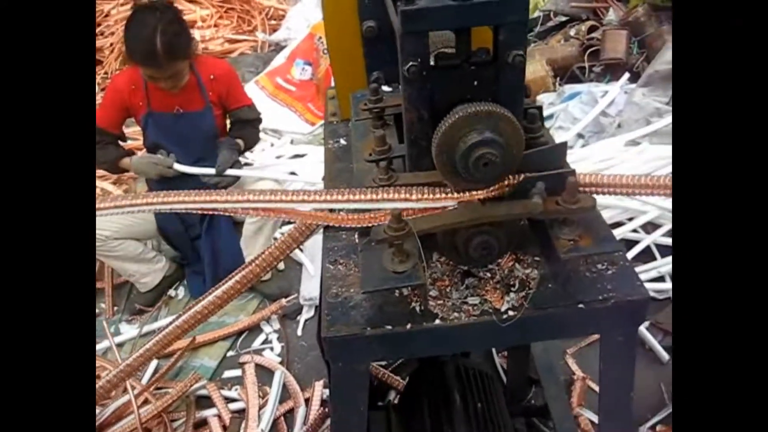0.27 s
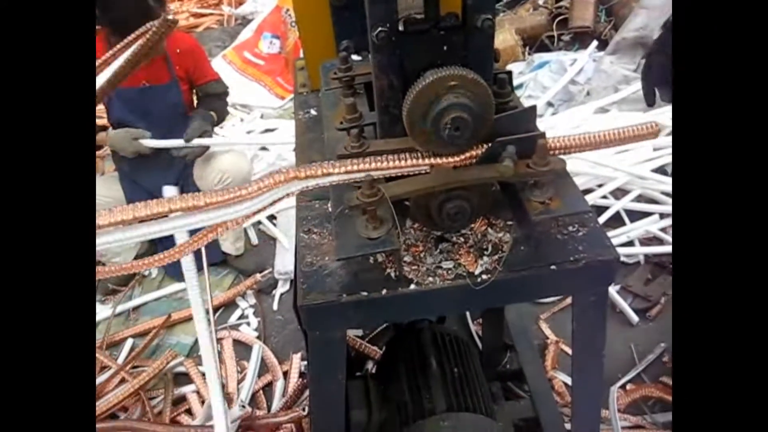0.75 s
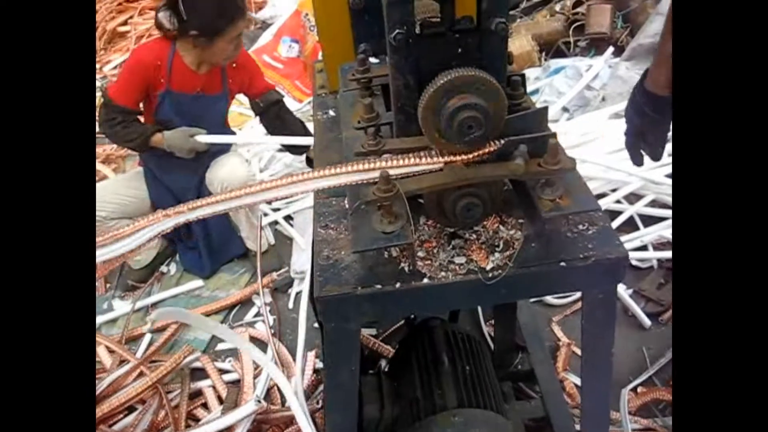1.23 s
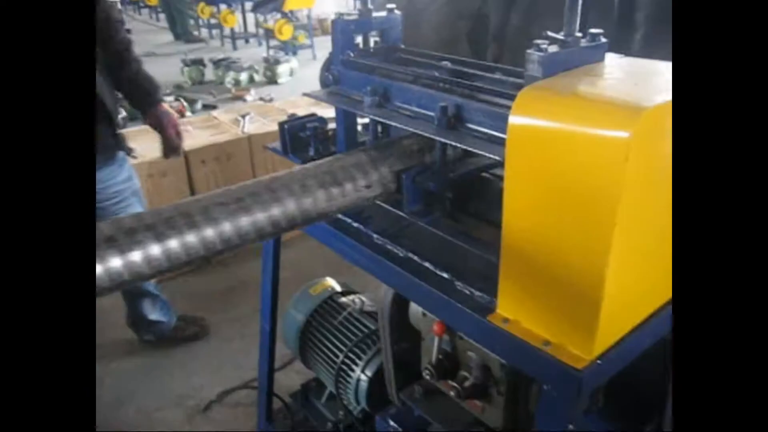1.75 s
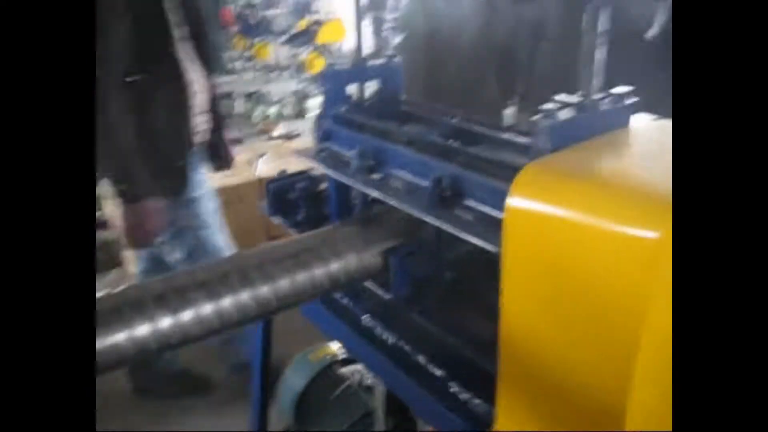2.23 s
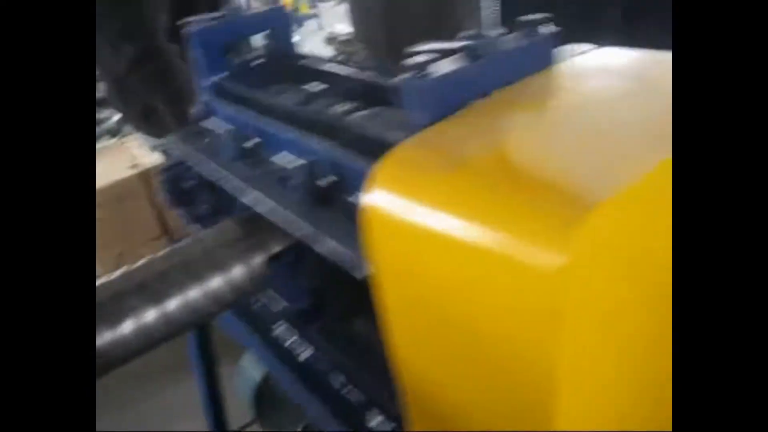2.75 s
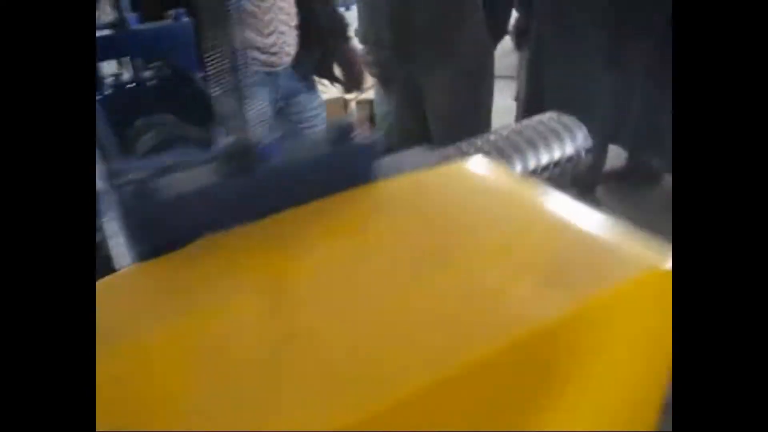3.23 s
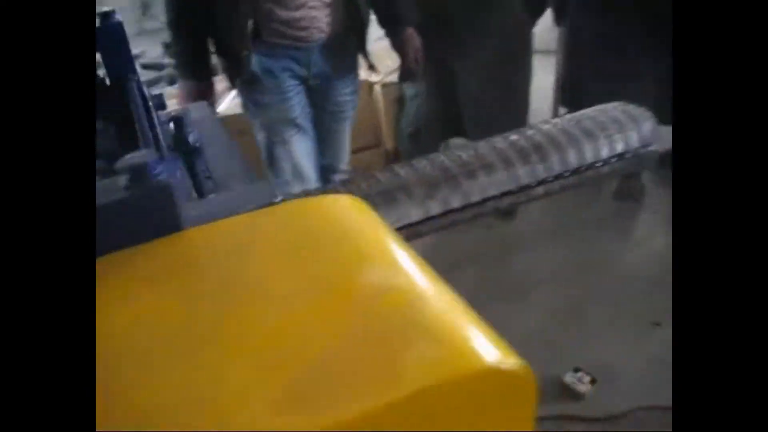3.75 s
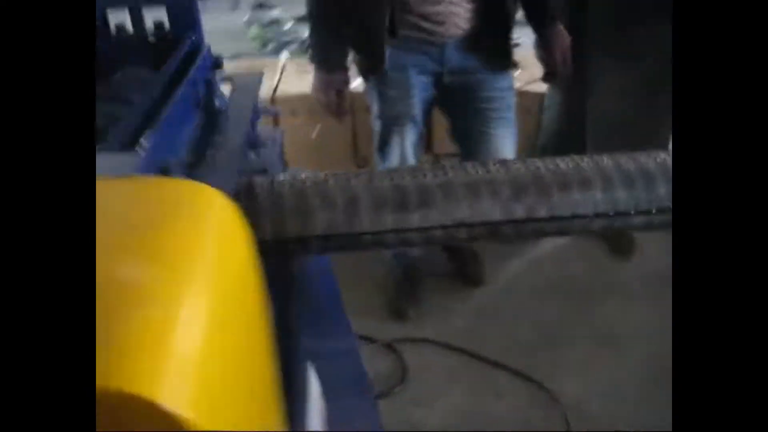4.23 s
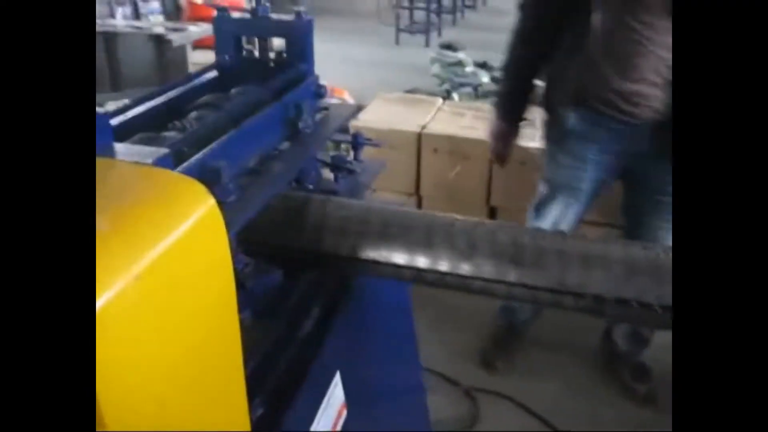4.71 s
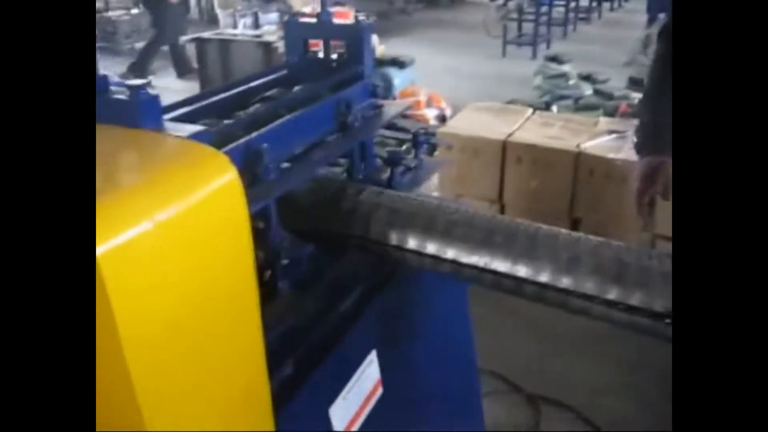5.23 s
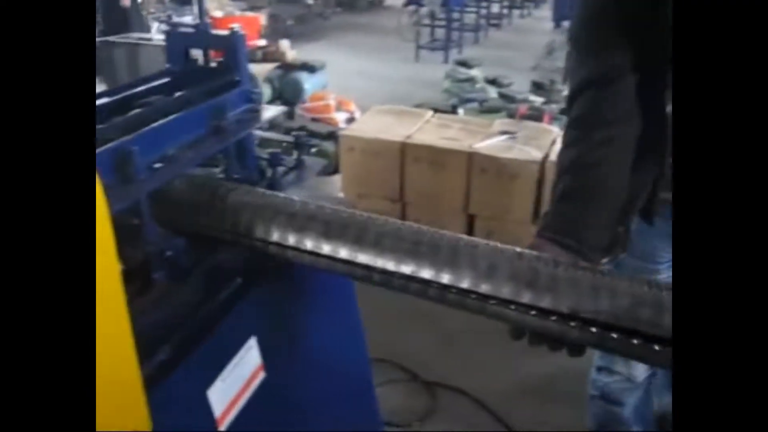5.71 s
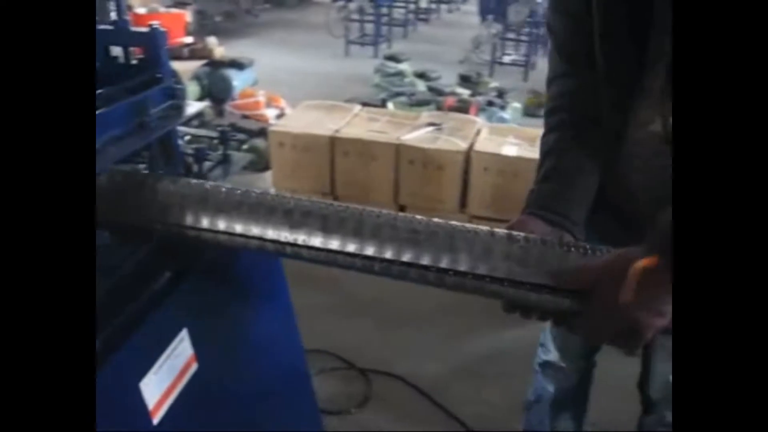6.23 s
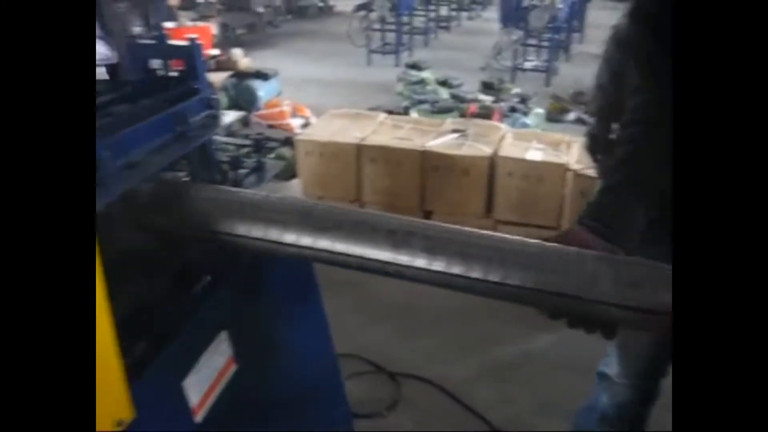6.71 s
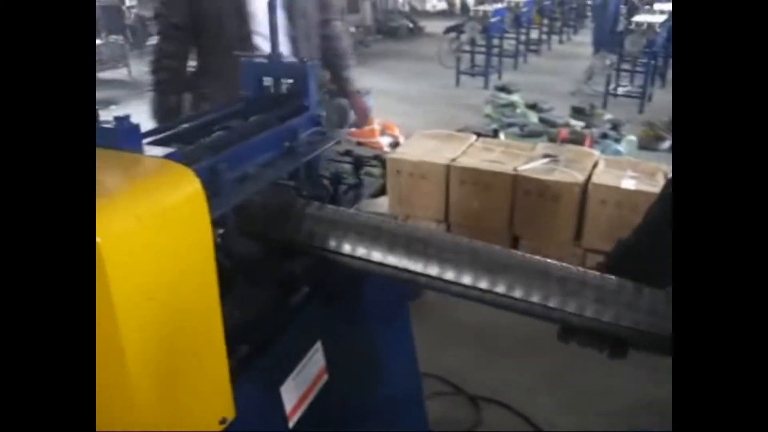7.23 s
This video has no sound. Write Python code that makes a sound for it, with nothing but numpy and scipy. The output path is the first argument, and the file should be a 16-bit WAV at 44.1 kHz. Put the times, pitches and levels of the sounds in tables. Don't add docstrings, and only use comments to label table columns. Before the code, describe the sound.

Close, band-limited camera sound of two cable-stripping machines. The first is small, with uneven tooth chatter, surging hum, bright copper scraping and one knock. A blink of silence follows, then a fuller, continuous grind from a large stripper, its gears swelling, rollers squeaking and blade hissing thinly. Dry clicks appear early, and two hard sheath snaps near the end briefly push the machine noise down.

```python
import sys
import numpy as np
from scipy import signal
from scipy.fft import rfft, irfft, next_fast_len
from scipy.io import wavfile
from scipy.ndimage import uniform_filter1d

SR = 44100
rng = np.random.default_rng(int(sys.argv[2]) if len(sys.argv) > 2 else 0)


def dump(signal):
    limited = np.clip(np.atleast_2d(signal).T, -1, 1)
    pcm = np.round(limited * 32767).astype(np.int16)
    wavfile.write(sys.argv[1], SR, pcm)


def boost(x):
    u = np.asarray(x, float) / 20
    return 10 ** u


N = 328986

# start_s, end_s
SHOT_TIMES = [
    (0, 1.7215),
    (1.8915, 7.46),
]

LAYER_BORDERS = [270, 1500, 3200]
# freq_hz, density_db (per Hz)
SMALL_CHATTER_COLOUR = [(15, -32), (25, 3), (64, -9.5), (194, -6.5), (233, -8.5), (280, -6), (499, -10.5),
                        (737, -6), (827, -10.5), (1250, -8.5), (1690, -11), (2560, -11.5), (4650, -11),
                        (6130, -22.5), (7970, -81.5), (13500, -120)]
LARGE_CHATTER_COLOUR = [(15, -49), (25, -10), (86, -11), (266, -7.5), (478, -15.5), (586, -16.5),
                        (734, -17.5), (1380, -19.5), (2020, -20), (3170, -20.5), (3630, -19.5),
                        (5450, -16.5), (7080, -23), (12000, -120)]
# freq_hz, width_hz, over_colour_db
SMALL_RESONANCES = [(63, 8.7, 2.5), (198.5, 10, 9), (227.3, 8.4, 10), (345, 14, 7.5), (364.4, 12, 6),
                    (440, 20, 7.5), (578, 18, 3.5), (603, 24, 6), (743.5, 19, 9.5), (984, 5.8, 5.5),
                    (1130, 14, -16), (1160, 11, 4), (1267, 36, 7), (1317, 28, -1.5), (2750, 970, -0.5)]
LARGE_RESONANCES = [(51, 12, 7.5), (67, 7.3, 5.4), (91, 12, 5.1), (134.8, 8, 7.6), (188.7, 9.1, 0.93),
                    (218.6, 7.7, 8.9), (294.7, 11, 4.6), (324, 4, 7.7), (367, 2.8, 3.4), (399.3, 16.7, 6.1),
                    (448, 5, 5.6), (586.6, 40, 7.5), (677, 23, 6.4), (666, 3.3, 1.3), (805, 38, 3.5),
                    (870, 3.9, 3), (930, 62, 4.5), (1068, 28, 5.5), (1860, 38, 2.5), (2010, 54, 3),
                    (2260, 25, 2.8), (3680, 930, 4.5), (5120, 47, 2.2)]
# time_s, load_db, openness_db
ROLLER_PULL = [
    [(0, -1, 2.5), (.25, 0.5, -1.5), (.6, 2, -3), (.8, 2, 0), (1.1, 0, 0.5), (1.23, -2, 4.5),
     (1.35, -4.5, 0), (1.48, -5.5, 1.5), (1.68, -7, -1.5)],
    [(1.9, 0.5, 1.5), (2.05, 0, 1), (2.19, 4.5, 0), (2.45, 4.5, -1.5), (2.86, 1.5, 0), (3.13, 0.5, 0.5),
     (3.4, 2.5, -1), (3.67, 0.5, 0.5), (4.07, -1.5, 1), (4.25, -3, 0), (4.75, -1, -1), (5.02, 0, -2),
     (5.42, 2, -2.5), (5.96, 0, -2), (6.2, 1, 0.5), (6.5, -0.5, -1.4), (7.05, 0.5, -0.5), (7.46, -3, -1)],
]
# rest_db, load_share, openness_share
LAYER_RESPONSE = [
    [(-37.5, 0.74, -0.26), (-30, 0.79, 0.19), (-33.5, 0.83, 0.45), (-34, 1.36, 1.5)],
    [(-29, 0.48, -0.56), (-28, 0.94, 0.35), (-30.5, 0.66, 0.45), (-27, 0.88, 1.28)],
]
# time_s, floor_db, frame_db
MIC_BOOM = [
    [(0, -2, 0.2), (.6, 2.5, 1.3), (1.1, 1.5, .1), (1.7, -0.5, -0.4)],
    [(1.9, 3, 0.5), (2.1, -1.5, 2.7), (2.45, 0, -1.5), (3.1, 1, 0.8), (3.5, -3, -0.7), (3.75, 2.5, 1),
     (4.2, -0.5, 1.7), (4.9, 0, 0.6), (5.6, -1.5, 0), (6.1, 0.5, -0.2), (6.4, 2, 0.1), (7.46, 1.5, -0.4)],
]

# start_s, length_s, level_db, pitch_hz
SMALL_MESH_SURGES = [(0.004, 0.075, -32, 292.3), (0.108, 0.028, -36, 293), (0.253, 0.04, -37, 290.8),
                     (0.356, 0.045, -33.5, 284), (0.428, 0.076, -32.5, 283.3), (0.547, 0.054, -27.5, 290.6),
                     (0.618, 0.057, -31, 288.7), (0.702, 0.14, -33.5, 279.4), (0.841, 0.15, -27, 292.2),
                     (1.004, 0.028, -29, 290), (1.069, 0.04, -29, 291.6), (1.122, 0.039, -23, 292.0),
                     (1.215, 0.061, -30.5, 291), (1.355, 0.042, -32.5, 292.5), (1.533, 0.068, -34.5, 295)]
LARGE_MESH_SURGES = [(1.956, 0.075, -25, 266.1), (2.186, 0.041, -26.5, 261.9), (2.268, 0.031, -31, 263.4),
                     (2.406, 0.039, -27, 269.9), (2.532, 0.1, -25.5, 267.2), (2.719, 0.061, -30.5, 266.6),
                     (2.855, 0.13, -26, 261.0), (3.086, 0.19, -21.5, 263.2), (3.381, 0.056, -35, 279.4),
                     (3.481, 0.032, -19.5, 273.7), (3.621, 0.056, -21, 266.1), (3.723, 0.18, -25, 266.6),
                     (3.962, 0.076, -22, 264.5), (4.078, 0.37, -26, 265.2), (4.495, 0.029, -22, 262.6),
                     (4.595, 0.043, -28, 268.6), (4.678, 0.1, -22, 265.5), (4.828, 0.035, -30, 268.6),
                     (5.034, 0.14, -28.5, 263.0), (5.209, 0.29, -32.5, 264.8), (5.528, 0.14, -28, 264.5),
                     (5.752, 0.11, -25.5, 261.9), (5.912, 0.06, -27, 268.6), (6.003, 0.09, -27.5, 266.2),
                     (6.149, 0.08, -27, 265.9), (7.272, 0.086, -29, 265.3)]
# start_s, length_s, level_db, pitch_hz
SHAFT_SURGES = [(1.927, 0.056, -39, 187.8), (2.239, 0.28, -31, 186.7), (2.482, 0.16, -33, 187.8),
                (2.653, 0.07, -29, 190.2), (2.782, 0.12, -24.5, 183.4), (2.948, 0.047, -29, 184.8),
                (3.024, 0.036, -23, 188.9), (3.13, 0.032, -38, 192.8), (3.2, 0.044, -33, 195.7),
                (3.293, 0.11, -28, 185.9), (3.428, 0.036, -30, 195.2), (3.496, 0.12, -24, 189.2),
                (3.686, 0.087, -33, 187.8), (3.883, 0.05, -29.5, 186.3), (4.664, 0.09, -32, 187.9),
                (4.919, 0.03, -21, 187.3), (5.016, 0.074, -44, 186.6), (5.438, 0.027, -34, 185.5),
                (5.723, 0.13, -28.5, 189.1), (5.934, 0.042, -30, 190.2), (7.177, 0.041, -35, 192.5)]
# time_s, level_db
MOTOR_WHINE = [(1.9, -36), (2.9, -38.5), (3.5, -40.5), (3.9, -60), (4.5, -45), (5.5, -42.5), (5.7, -45.5),
               (6.1, -41), (7.4, -42.5)]
# start_s, length_s, pitch_hz, level_db
ROLLER_SQUEALS = [(0.355, 0.83, 63, -40.5), (2.038, 0.11, 345, -27), (2.364, 0.31, 2000, -49),
                  (2.62, 0.35, 2110, -40), (3.007, 0.2, 2005, -38), (3.2, 0.13, 1870, -35.5),
                  (3.558, 0.21, 2260, -34.5), (3.551, 0.36, 393.6, -35), (3.62, 0.27, 501, -36),
                  (3.599, 0.14, 637, -37.5), (3.602, 0.36, 708, -37.5), (3.605, 0.21, 2000, -36),
                  (3.941, 0.47, 330.3, -31), (4.148, 0.22, 2010, -44), (4.35, 0.15, 1860, -38),
                  (5.304, 0.33, 2010, -38.5), (5.628, 0.23, 2043, -34.5), (5.68, 0.22, 2130, -37),
                  (5.846, 0.33, 1755, -40), (6.65, 0.49, 1796, -40)]
# time_s, pitch_hz, level_db
BLADE_HISS = [(1.9, 3700, -46), (2.4, 3640, -40), (2.9, 3620, -41), (3.3, 3670, -35.5), (3.6, 3650, -38),
              (4.1, 3720, -44.5), (4.5, 3700, -44), (4.8, 3540, -42), (5.1, 3560, -42.5), (5.45, 3580, -34),
              (5.7, 3590, -43), (6.15, 3630, -38), (6.5, 3650, -43), (6.9, 3630, -40), (7.46, 3660, -41)]

# start_s, peak_db, centre_hz, width_hz, t60_s
COPPER_SCRAPES = [(.255, -21, 4000, 1500, 0.056), (.332, -17.5, 4680, 1500, 0.19),
                  (0.417, -14, 4970, 1199, 0.048), (1.152, -13, 3350, 550, .12),
                  (1.207, -21, 3200, 905, 0.43), (1.153, -15, 4730, 397, 0.069),
                  (1.221, -15, 4430, 250, 0.12), (1.542, -18.5, 3800, 1498, 0.16),
                  (1.556, -21, 3800, 1500, 0.14), (1.631, -14.5, 4034, 1912, 0.093),
                  (1.657, -24, 4950, 1201, 0.05), (1.703, -28.5, 3736, 2110, 0.054)]
# start_s, peak_db, t60_s
GRIT_TICKS = [
    (2.985, -6.5, 0.019),
    (3.0118, -16.5, .02),
    (3.3485, -13, .02),
    (3.516, -16.5, .02),
    (3.548, -14, 0.027),
    (5.099, -24, .03),
]
# start_s, level_db, centre_hz, width_hz, fade_s
SNAP_TAILS = [(1.156, -27.5, 900, 299, 0.024), (2.115, -22, 2850, 450, 0.022),
              (2.114, -24, 3920, 500, .012), (6.218, -23, 1090, 260, 0.047),
              (6.217, -21.5, 2960, 450, .035), (6.22, -25, 1600, 350, 0.052), (6.25, -27, 855, 300, 0.08),
              (7.334, -25.5, 1210, 350, 0.037), (7.337, -27, 2980, 400, 0.044),
              (7.343, -24.5, 881, 170, 0.041)]
# start_s, peak_db, ring_hz, ring_length (factor), singing_db
SHEATH_SNAPS = [
    (1.155, -12, 2800, 0.8, -2),
    (2.1145, -11, 2730, 0.6, -2),
    (6.2158, -2.5, 2920, 0.75, -4),
    (7.3322, -1.5, 2750, 1.0, -4),
]
# pitch_ratio (times ring_hz), level_db, t60_s
SHEATH_MODES = [(.76, -6, .012), (.87, -6, .012), (1.0, -5, 0.02), (1.09, -5, .025), (1.22, -6, 0.014),
                (1.38, -7, .012), (1.62, -11, 0.01)]
# delay_s, level_db
WALL_ECHO = (.0225, -13)

# start_s, drop_db, recovery_s
GAIN_DUCKS = [
    (1.155, 1.5, 0.16),
    (1.626, 12, 0.0031),
    (1.895, 13.5, 0.014),
    (2.116, 6.5, 0.11),
    (2.988, 11, 0.017),
    (6.216, 5.5, 0.45),
    (7.335, 4, .4),
]
# freq_hz, lift_db
RIGHT_LIFT = [(400, 0.0), (700, 0.09), (1200, .5), (1800, 1.0), (5500, 1.07), (6300, -4.5)]
LIFT_SHARE = [.5, 1.0]
# freq_hz, level_db
TOP_BAND_COLOUR = [(6900, -23.5), (7500, -5.5), (9000, -1.5), (9400, -2), (9700, -35.5)]
TOP_BAND_DB = [-46.5, -45]
TOP_BAND_GATE = [-0.52, -1.3]
CONVERTER_OFFSET = [-.0087, -.0081]


def evened(x):
    return x / np.sqrt(np.mean(x ** 2) + 1e-20)


def read(points, hz):
    f, value = np.transpose(points)
    return np.interp(np.log(hz + 1), np.log(f + 1), value)


def shaped(x, gain):
    size = next_fast_len(x.shape[-1])
    spectrum = rfft(x, size) * gain(np.fft.rfftfreq(size, 1 / SR))
    return irfft(spectrum, size)[..., :x.shape[-1]]


def add(mix, s, sound):
    part = mix[round(s * SR):][:len(sound)]
    part += sound[:len(part)]


def wander(count, smooth_s):
    span = max(int(smooth_s * SR), 2)
    once = uniform_filter1d(rng.standard_normal(count), span)
    return evened(uniform_filter1d(once, span))


def top_band(gate):
    z = signal.stft(rng.standard_normal(N), nperseg=1024)[2]
    whole = rng.standard_normal((len(z.T), 1))
    strips = rng.standard_normal((len(z.T), 33))
    chance = uniform_filter1d(0.61 * whole + 0.85 * strips, 3, 0) * np.sqrt(3)
    is_open = np.repeat(chance, 16, 1)[:, :len(z)].T > gate
    blocks = signal.istft(z * is_open, nperseg=1024)[1][:N]
    return evened(shaped(blocks, lambda hz: boost(read(TOP_BAND_COLOUR, hz)) * (abs(hz - 8300) < 1400)))


def tone(t, rows, waver_hz, waver_s, rough_db):
    s, hz, db = np.transpose(rows)
    pitch = np.interp(t, s, hz) + waver_hz * wander(len(t), waver_s)
    level_db = np.interp(t, s, db) + rough_db * wander(len(t), waver_s)
    return np.sqrt(2) * boost(level_db) * np.sin(2 * np.pi * np.cumsum(pitch) / SR)


def whine(t):
    rows = [(s, 888, db) for s, db in MOTOR_WHINE]
    return tone(t, rows, waver_hz=1.07, waver_s=0.065, rough_db=2.5)


def hum(t, surges, rest_db, waver_hz, waver_s, rough_db):
    start, length, db, hz = np.transpose(surges)
    rise_s = 0.017
    step = t[::64, None]
    inside_s = np.minimum(step - start, start + length - step)
    edges = np.clip(inside_s / rise_s + .5, 0, 1)
    swell = boost(rest_db) + (edges ** 2 * boost(db - 3.5)).sum(1)
    line = tone(t, np.transpose([start + length / 2, hz, 0 * hz]), waver_hz, waver_s, rough_db)
    return np.interp(t, step[:, 0], swell) * line


def squeal(s, length_s, hz, db):
    t = np.arange(SR) / SR
    swell = np.sin(np.pi * np.clip(t / length_s, 0, 1))
    return s, swell * tone(t, [(0, hz, db)], waver_hz=.02 * hz, waver_s=.006, rough_db=4.0)


def blade(t):
    s, hz, db = np.transpose(BLADE_HISS)
    width_hz = 64
    a, b = shaped(rng.standard_normal((2, len(t))), lambda f: 1 / (1 + (2 * f / width_hz) ** 2))
    turn = np.exp(2j * np.pi * np.cumsum(np.interp(t, s, hz)) / SR)
    return boost(np.interp(t, s, db)) * evened(((a + 1j * b) * turn).real)


def chatter(t, pull, boom, layers, colour, frame, flicker_db, patchy_db):
    teeth = rng.standard_normal(len(t)) * boost(flicker_db * wander(len(t), 0.0062))
    z = signal.stft(teeth, nperseg=512)[2]
    over_time = uniform_filter1d(rng.standard_normal(z.T.shape), 9, 0)
    patches = evened(uniform_filter1d(over_time, 6, 1)).T
    teeth = signal.istft(z * boost(patchy_db * patches), nperseg=512)[1][:len(t)]

    def body(hz):
        ringing = sum(boost(2 * db) / (1 + (2 * (hz - f) / width) ** 2) ** 2 for f, width, db in frame)
        return boost(read(colour, hz)) * np.sqrt(1 + ringing)

    s, load_db, open_db = np.transpose(pull)
    boom_s, *boom_db = np.transpose(boom)
    borders = [0, *LAYER_BORDERS, SR]
    out = 0
    for k, (rest_db, of_load, of_open) in enumerate(layers):
        layer = shaped(teeth, lambda hz: body(hz) * (hz >= borders[k]) * (hz < borders[k + 1]))
        level_db = rest_db + np.interp(t, s, of_load * load_db + of_open * open_db)
        if k < 2:
            level_db = level_db + np.interp(t, boom_s, boom_db[k])
        out = out + boost(level_db) * evened(layer)
    return out


def scrape(s, peak_db, centre_hz, width_hz, rise_s, t60):
    t = np.arange(SR // 4) / SR
    grit = rng.standard_normal(len(t)) * boost(2.1 * wander(len(t), 0.0019))
    grit = shaped(grit, lambda hz: 1 / (1 + ((hz - centre_hz) / width_hz) ** 4) / (1 + (hz / 5900) ** 24))
    return s, boost(peak_db - 9.0 - 60 * t / t60) * (1 - np.exp(-t / rise_s)) * evened(grit)


def tick(s, peak_db, t60):
    return scrape(s, peak_db, centre_hz=3300, width_hz=2400, rise_s=.0005, t60=t60)


def shake(s, db, centre_hz, width_hz, fade_s):
    t = np.arange(SR // 3) / SR
    buzz = shaped(rng.standard_normal(len(t)), lambda hz: 1 / (1 + ((hz - centre_hz) / width_hz) ** 2))
    return s, boost(db) * evened(buzz) * np.exp(-t / fade_s) * (1 - np.exp(-t / 0.0048))


def rings(modes, scale, longer, t):
    return sum(boost(db - 60 * t / (t60 * longer)) * np.sin(2 * np.pi * hz * scale * t)
               for hz, db, t60 in modes)


def snap(s, peak_db, ring_hz, longer, sing_db):
    t = np.arange(SR // 3) / SR
    since_crack = t - .0012
    crack = np.cos(2 * np.pi * ring_hz * since_crack) * np.exp(-(since_crack / .0003) ** 2)

    rattle_fade = np.exp(-t / .0012) + .12 * np.exp(-(t / (.012 * longer)) ** 2)
    rattle = rng.standard_normal(len(t)) * rattle_fade
    sheath = signal.fftconvolve(rattle, rings(SHEATH_MODES, ring_hz, longer, t))[:len(t)]
    sheath = shaped(sheath, lambda hz: 1 / (1 + (1700 / (hz + 1)) ** 6))

    sing_s, sag = .019, .035
    part = np.clip(t / (sing_s * longer), 0, 1)
    sing_hz = ring_hz * (1 + sag * (.5 - part))
    sing = np.sin(np.pi * part ** .8) ** 1.5 * np.sin(2 * np.pi * np.cumsum(sing_hz) / SR)

    blow = .3 * crack + .5 * sheath / abs(sheath).max() + boost(sing_db - 5) * sing
    echo_s, echo_db = WALL_ECHO
    add(blow, echo_s, boost(echo_db) * blow)
    return s, boost(peak_db) * blow


def ducked(mix, t):
    for s, drop_db, recover_s in GAIN_DUCKS:
        mix = mix * boost(-drop_db * (t > s) * np.exp(-abs(t - s) / recover_s))
    return mix


def scene():
    mix, t = np.zeros(N), np.arange(N) / SR
    small, large = (t[round(a * SR):round(b * SR)] for a, b in SHOT_TIMES)

    def add_small(sound):
        add(mix, small[0], sound)

    def add_large(sound):
        add(mix, large[0], sound)

    add_large(whine(large))
    add_small(hum(small, SMALL_MESH_SURGES, rest_db=-40.5, waver_hz=13.3, waver_s=0.0094, rough_db=1.5))
    add_large(hum(large, LARGE_MESH_SURGES, rest_db=-37.0, waver_hz=4.05, waver_s=.025, rough_db=2.5))
    add_large(hum(large, SHAFT_SURGES, rest_db=-44, waver_hz=3.8, waver_s=0.029, rough_db=2.0))
    for row in ROLLER_SQUEALS:
        add(mix, *squeal(*row))
    add_large(blade(large))
    add_small(chatter(small, ROLLER_PULL[0], MIC_BOOM[0], LAYER_RESPONSE[0], SMALL_CHATTER_COLOUR,
                      SMALL_RESONANCES, flicker_db=1.16, patchy_db=-1.03))
    add_large(chatter(large, ROLLER_PULL[1], MIC_BOOM[1], LAYER_RESPONSE[1], LARGE_CHATTER_COLOUR,
                      LARGE_RESONANCES, flicker_db=0.46, patchy_db=0.63))
    mix = ducked(mix, t)

    for s, peak_db, centre_hz, width_hz, t60 in COPPER_SCRAPES:
        add(mix, *scrape(s, peak_db, centre_hz, width_hz, rise_s=0.004, t60=t60))
    for row in GRIT_TICKS:
        add(mix, *tick(*row))
    for row in SNAP_TAILS:
        add(mix, *shake(*row))
    for row in SHEATH_SNAPS:
        add(mix, *snap(*row))
    return np.array([mix, mix])


def roll_off(x):
    return signal.sosfilt(signal.butter(12, 9800, fs=SR, output="sos"), x)


def record(dry):
    out, t = np.zeros_like(dry), np.arange(N) / SR
    loudness = np.sqrt(abs(uniform_filter1d(dry[0] ** 2, 1000)))
    treble = shaped(dry[0], lambda hz: hz > 2000)
    sharp = np.sqrt(abs(uniform_filter1d(treble ** 2, size=2400)))
    spill = evened(shaped(rng.standard_normal(N), lambda hz: abs(hz - 6900) < 600))
    splash = boost(-35.5) * np.maximum(sharp - .12 / 2, 0) * spill
    limits_hz = [7200, 5560]
    for k, (start, end) in enumerate(SHOT_TIMES):
        def microphone(hz):
            low_cut = hz ** 3 / (hz ** 3 + 40 ** 3)
            return np.clip((limits_hz[k] - hz) / 260 + .5, 0, 1) ** 2 * low_cut

        mono = shaped(dry[0], microphone)
        stray = boost(-47.5) * shaped(np.roll(mono, 900), lambda hz: np.clip(hz / 1200, 0, 1) ** 2)
        right = shaped(mono, lambda hz: boost(LIFT_SHARE[k] * read(RIGHT_LIFT, hz) / 2)) + stray
        left = 2 * mono - right
        both = boost(TOP_BAND_DB[k]) * loudness * top_band(TOP_BAND_GATE[k]) + CONVERTER_OFFSET[k]
        if k == 1:
            both = both + splash
        early_s = .001 * (k == 0)
        running = np.clip(np.minimum(t - start + early_s, end - t) / .001, 0, 1)
        out += (np.array([left, right]) + both) * running
    return roll_off(out)


dry = scene()
out = record(dry)
dump(out)
```